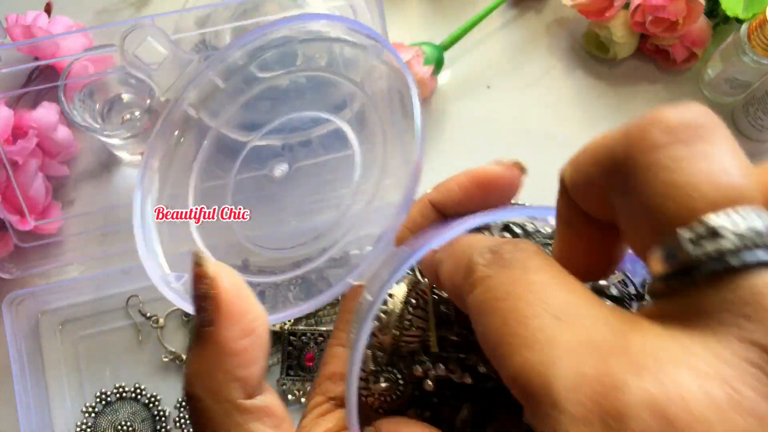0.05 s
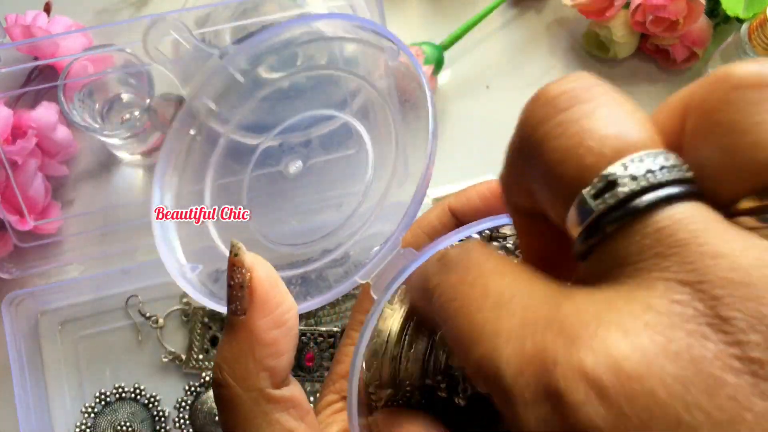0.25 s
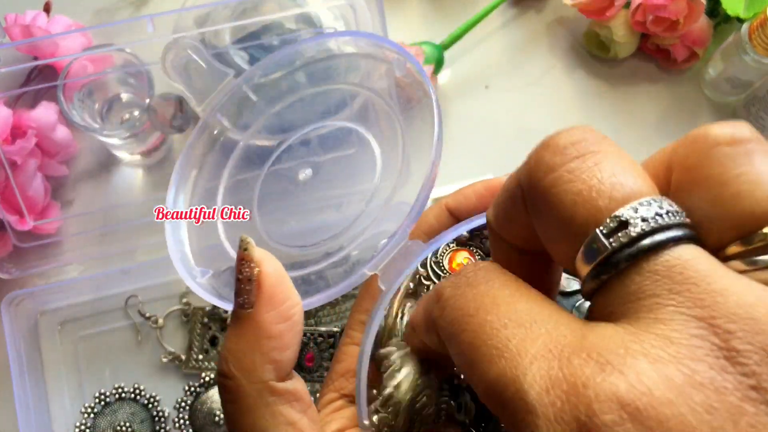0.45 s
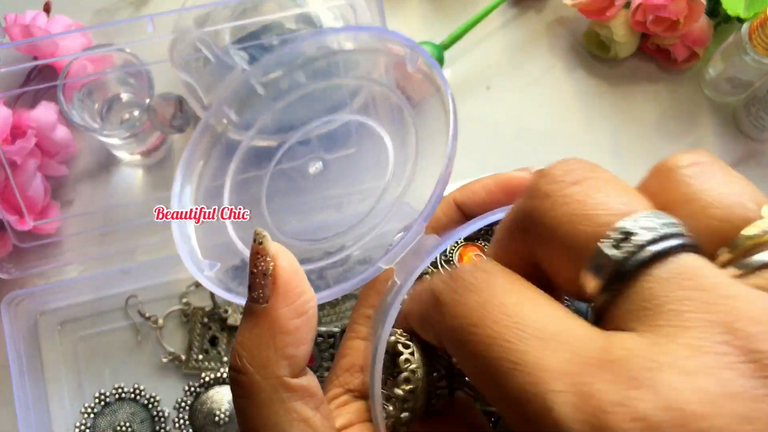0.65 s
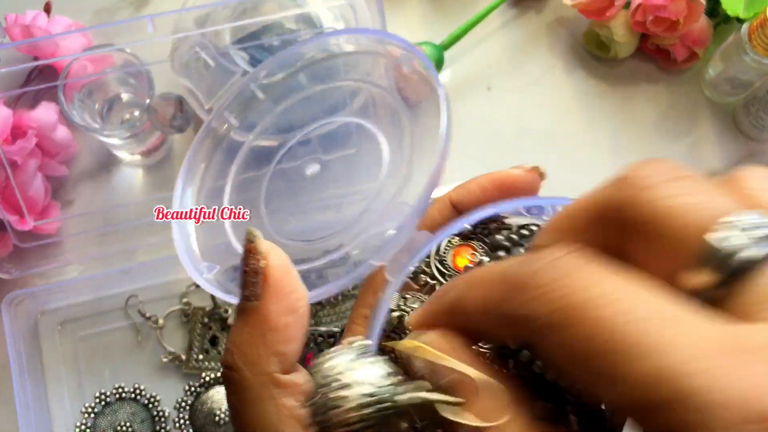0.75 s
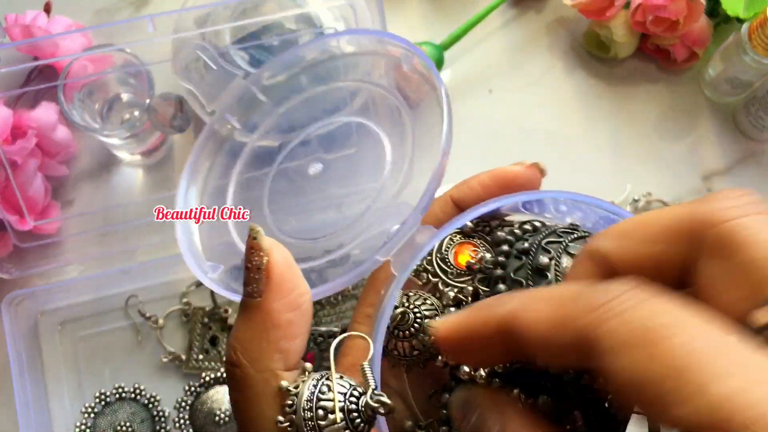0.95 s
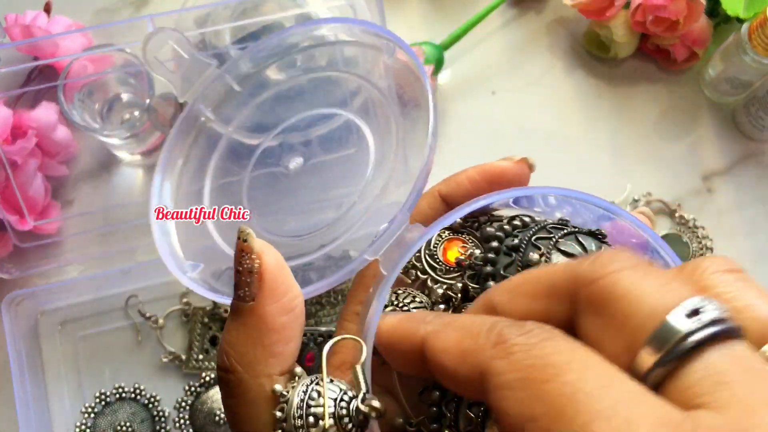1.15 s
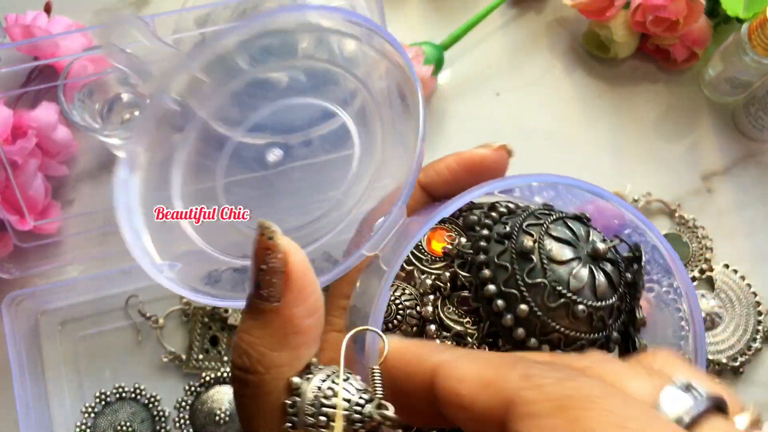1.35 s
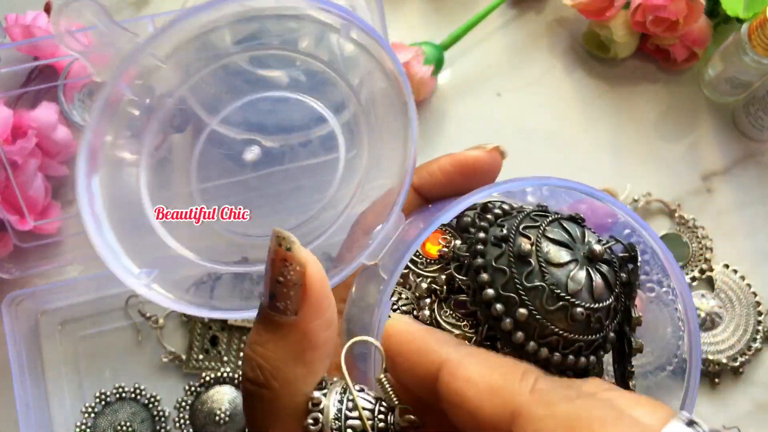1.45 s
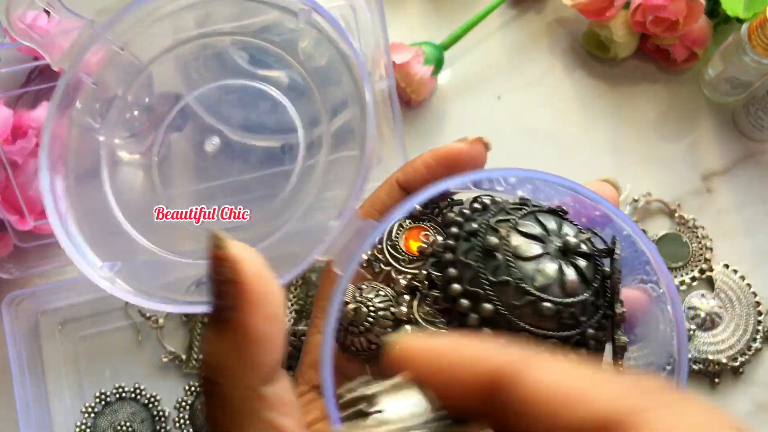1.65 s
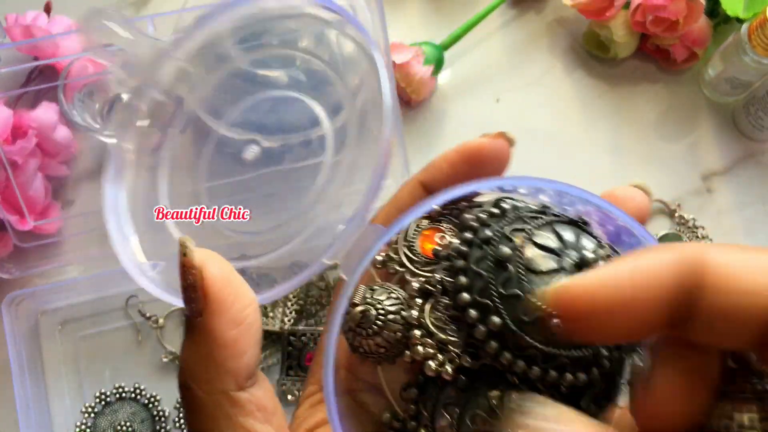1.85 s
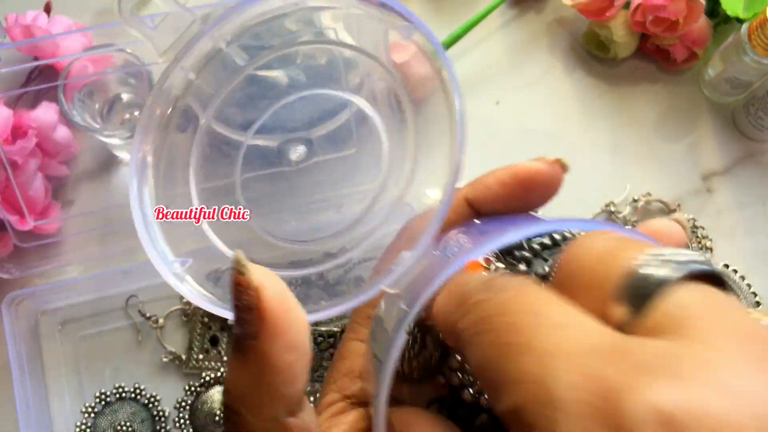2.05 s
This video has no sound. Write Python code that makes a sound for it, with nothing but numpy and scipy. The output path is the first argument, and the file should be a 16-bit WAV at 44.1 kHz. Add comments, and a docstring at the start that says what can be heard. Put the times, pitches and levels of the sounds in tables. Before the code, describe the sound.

Small metal earrings rattle and clink close by as fingers dig through a plastic tub, in quick surges from about 0.2 to 0.7 seconds. At 0.8 seconds the tub takes one hollow knock. Softer nail taps and finger rubs on the plastic follow. Tiny beads jingle very high around 1.8 seconds, and the earrings shift lightly just after 2 seconds. The quiet room has a faint hum.

```python
"""Fingers dig through small metal earrings in a plastic tub, close by in a quiet room with a faint mains hum.
Skin rubs softly, single pieces clink, and the heap shifts in rattling surges of tiny collisions that set
the metal ringing, while pieces bump the wall. Dangling beads jingle very high and the tub takes one hollow
knock. Then nails and hooks tap the plastic, fingers rub along it, and the beads shake again near the end."""
import sys
import numpy as np
from scipy import signal
from scipy.fft import rfft, irfft
from scipy.io import wavfile

SR = 44100
rng = np.random.default_rng(int(sys.argv[2]) if len(sys.argv) > 2 else 0)


def materialize(psi):
    """Save the field psi as 16-bit PCM at rate SR to the path in sys.argv[1].

    A 1-D psi becomes a single channel; in a 2-D psi each row is a channel.
    """
    bounded = np.clip(np.atleast_2d(psi).T, -1, 1)
    quanta = np.round(bounded * 32767).astype(np.int16)
    wavfile.write(sys.argv[1], SR, quanta)


N = 92610


def amp(db):
    """Decibels to gain."""
    return 10 ** (np.asarray(db) / 20)


def unit_rms(x):
    """Scales to rms 1."""
    return x / np.sqrt(np.mean(x ** 2) + 1e-20)


def curve_at(points, hz):
    """Reads a curve on a log-frequency axis."""
    freqs, values = np.transpose(points)
    return np.interp(np.log(hz + 1), np.log(freqs + 1), values)


def add(mix, start_s, sound):
    """Mixes a sound in at its start time."""
    part = mix[max(round(start_s * SR), 0):][:len(sound)]
    part += sound[:len(part)]


def equalise(x, points, size=1024):
    """Minimum-phase EQ through points of (frequency [Hz], gain [dB])."""
    log_gain = np.log(amp(curve_at(points, abs(np.fft.fftfreq(size, 1 / SR)))))
    impulse = np.fft.ifft(np.exp(np.conj(signal.hilbert(log_gain)))).real
    return signal.fftconvolve(x, impulse[:size // 2])


def low_cut(x, hz):
    """Steep high-pass."""
    return signal.sosfilt(signal.butter(4, hz, "highpass", fs=SR, output="sos"), x)


def flat_noise(size):
    """Noise with an even spectrum and random phases."""
    return unit_rms(irfft(np.exp(2j * np.pi * rng.random(size // 2 + 1))))


def ring(modes, detune=1):
    """Dying sines of a struck object."""
    t = np.arange(SR // 3) / SR
    return sum(amp(db - 60 * t / t60) * np.sin(2 * np.pi * hz * detune * t) for hz, db, t60 in modes)


def contact_tone(x, lows, mids, top, resonance_hz=None):
    """Voices one contact: lows, mids and top in dB against 6 kHz, and a brief resonance if struck."""
    # EQ points for lows, mids, reference and top: (frequency [Hz])
    bands_hz = [900, 2500, 6000, 13000]
    if resonance_hz is not None:
        b, a = signal.iirpeak(resonance_hz, Q=4, fs=SR)
        x = (x + amp(1) * signal.lfilter(b, a, x)) / np.sqrt(2)
    return equalise(x, list(zip(bands_hz, [lows, mids, 0, top])), size=256)


def swarms(rows, grains_per_s, spread_db, grain_decay_s=0.00066, fuzz=0.44, size=16384):
    """Crowds of tiny collisions that swell to a crest and die away."""
    out = np.zeros(N + size)
    t = (np.arange(size) - size // 2) / SR  # zero at the crest
    power_decay = np.exp(-2 / (grain_decay_s * SR))
    for crest_s, db, rise, fall, *tone in rows:
        onsets = rng.random(size) < grains_per_s / SR
        hits = onsets * amp(spread_db * np.minimum(rng.exponential(1, size), 4))
        clicks = hits * rng.choice([-1, 1], size)
        tails = np.sqrt(signal.lfilter([1], [1, -power_decay], hits ** 2))  # each click trails noise
        grains = unit_rms(clicks + fuzz * tails * rng.standard_normal(size))
        swell = np.exp(np.minimum(t / rise, -t / fall))
        add(out, crest_s, amp(db) * contact_tone(grains * swell, *tone))
    return out[size // 2:][:N]


def strikes(rows):
    """Each strike is a snap followed by a few milliseconds of chatter."""
    out = np.zeros(N)
    for start_s, db, decay, *tone in rows:
        chatter = np.concatenate([flat_noise(64) for _ in range(24)])
        chatter[0] = 3.2  # the snap
        t = np.arange(len(chatter)) / SR
        add(out, start_s, amp(db) * contact_tone(chatter * np.exp(-t / decay), *tone))
    return out


def room_tone(air_db=-57.5):
    """A bed of low room air and steady mains hum."""
    # Spectrum of the air: (frequency [Hz], relative level [dB])
    air_curve = [(20, -33.5), (35, -11), (56, 7.5), (72, 0.5), (130, -4.5), (250, -4), (400, -14.5),
                 (1000, -21), (4000, -28), (9000, -35.5), (15500, -29)]
    # Hum tones: (frequency [Hz], rms level [dB])
    hum_tones = [(55.5, -67.5), (100, -63.5), (200, -67.5)]
    t = np.arange(N) / SR
    air_gain = amp(curve_at(air_curve, np.fft.rfftfreq(N, 1 / SR)))
    air = irfft(rfft(rng.standard_normal(N)) * air_gain, N)
    hum = sum(amp(db) * np.sqrt(2) * np.sin(2 * np.pi * (hz * t + rng.random())) for hz, db in hum_tones)
    return amp(air_db) * unit_rms(air) + hum


def finger_rubs():
    """Skin drags over plastic and filigree in soft, grainy swells."""
    # Strokes: (crest time [s], level [dB], rise [s], fall [s], lows [dB], mids [dB], top [dB])
    strokes = [(.025, -51.5, 0.15, 0.015, 2.5, 3.5, -0.5), (.088, -44, 0.018, 0.027, 5, 4, -0.5),
               (.112, -47.5, 0.0044, 0.049, -3, 2, -12), (.83, -51.5, 0.035, 0.094, 6, 4, 6.5),
               (1.012, -51, 0.015, 0.023, 7, 6, -8), (1.128, -41.5, 0.0054, 0.026, -13, -6.5, -18),
               (1.29, -51, 0.11, 0.074, 1.5, 1.5, -3), (1.385, -52, 0.073, 0.097, -21, -11, -5),
               (1.458, -41.5, 0.034, 0.023, -0.5, -1.5, -13), (1.535, -42, 0.016, 0.013, 3, 5, -9),
               (1.618, -44, 0.011, 0.011, -0.5, -2, -2), (1.72, -65.5, 0.047, 0.027, -12, 3, 11),
               (1.92, -60.5, .02, 0.01, -28, -7, 11), (1.805, -43, 0.025, 0.029, -5, -4, -3),
               (1.872, -44, 0.024, 0.0077, -4.5, -3, 6.5), (2.025, -45.5, 0.0033, 0.034, 4.5, 2.5, -1),
               (2.072, -48.5, 0.0095, 0.025, 2, 5, -1)]
    return swarms(strokes, grains_per_s=7000, spread_db=4)


def earring_clinks():
    """Metal strikes metal, one piece at a time."""
    # Clinks: (time [s], level [dB], decay [s], lows [dB], mids [dB], top [dB], resonance [Hz])
    clinks = [(.0615, -36, 0.0019, -5, -18, 4, 7200), (.101, -26.5, 0.0036, 7.5, 5, 2, 6100),
              (.1205, -29, 0.0023, 0.5, 4.5, -7, 3740), (.1962, -41, 0.009, 8.5, 6.5, -1, 6000),
              (.2675, -18, 0.0011, -20, -9.5, 8, 3170), (.2843, -6.5, 0.0011, -29, -16, 2, 6430),
              (.2945, -7.5, 0.0018, -29, -0.5, -4, 6250), (.3262, -14, .0015, -16, -5, 4, 6200),
              (.3392, -11.5, 0.0011, 5.5, -17, -17, 6000), (.356, -12.5, 0.002, -14, -25, -3, 6200),
              (.4255, -26.5, 0.0071, 1, -2, 1, 1130), (.457, -14, 0.00061, 6, 6.5, -2, 4250),
              (.4797, -11.5, 0.00075, -12, 0, -4, 3100), (.4838, -16.5, 0.002, -33, 6, -2, 4260),
              (.497, -21, 0.0031, 6.5, -4, -5, 1050), (.5112, -18.5, .001, -2, 1, 9, 5780),
              (.518, -10, 0.0014, -11.5, -5, -0.5, 3160), (.557, -20, 0.0007, -7, 0.5, -3.5, 3420),
              (.6195, -24.5, 0.00088, -16, 6, -9, 4110), (.6355, -21, 0.0013, -16, 0, 2, 6000),
              (.6455, -2, 0.00084, -10, -13, -5, 3970), (.669, -26.5, 0.0038, 1.5, -1, -15, 3550),
              (.7088, -14.5, 0.0013, 1.5, -5, -5, 4000), (.737, -34, .0012, -15, 3, 4, 13800),
              (.778, -31.5, .003, -5, -4, 6, 3790), (.829, -33, 0.0016, 7, -15, 11, 8520)]
    return strikes(clinks)


def earring_ring(blows, piece_s=.02, tuning_spread=.07):
    """One earring after another takes the blows and rings, each tuned a little differently."""
    # Modes of an earring: (frequency [Hz], gain [dB], t60 [s])
    metal_modes = [(1060, -58.5, 0.099), (1162, -39, 0.035), (2280, -40.5, 0.088), (4415, -36, 0.027),
                   (6400, -61, 0.069), (6960, -55, 0.054)]
    piece = np.arange(N) // round(piece_s * SR)
    out = np.zeros(N)
    for k in np.unique(piece):
        detune = 1 + tuning_spread * rng.uniform(-0.95, 1)
        add(out, k * piece_s, signal.fftconvolve(blows[piece == k], ring(metal_modes, detune)))
    return out


def heap_surges():
    """The heap shifts and many pieces collide in a rattling rush."""
    # Surges: (crest time [s], level [dB], rise [s], fall [s],
    #          lows [dB], mids [dB], top [dB], resonance [Hz])
    surges = [(.2355, -15.5, 0.0057, 0.0078, -0.5, 3.5, 3, 3030),
              (.279, -21, 0.0026, 0.013, -8, 3, -0.5, 3160),
              (.294, -13, 0.0082, 0.0085, 0.5, -0.5, 4, 1015),
              (.330, -19.5, 0.0082, 0.0073, -12, 2, -2, 11600),
              (.340, -22, 0.0012, 0.011, 0.5, 3.5, 9.5, 6300), (.359, -20, 0.003, 0.012, -4, 1.5, 4, 6160),
              (.371, -20, 0.0029, 0.0018, 0, -10, -4, 6370),
              (.392, -35.5, 0.0053, 0.042, -4, 10.5, 5, 1070),
              (.437, -24.5, 0.0011, 0.014, 2, 6.5, 4.5, 3030),
              (.4578, -16, 0.0008, 0.0017, 1, 3.5, 2, 4120), (.470, -20.5, 0.0032, 0.0062, 4.5, 1, 5, 1040),
              (.484, -22, 0.0018, 0.01, -2, -5, 4, 12300), (.504, -18.5, 0.0018, 0.0051, -6, 1.5, 4, 5450),
              (.524, -25.5, 0.0026, 0.022, -8.5, 2.5, -2, 1050),
              (.620, -37, 0.018, 0.022, 7, 5.5, 0.5, 4020),
              (.647, -9.5, 0.0035, 0.0041, -13, -14.5, -2, 3770),
              (.658, -31.5, 0.0057, 0.026, 6, 8.5, 3, 6900), (.716, -41, 0.0067, 0.026, 2.5, 6.5, -4, 1030),
              (1.781, -37, 0.0057, 0.0046, 8.5, 8, 2, 4040),
              (2.088, -32.5, 0.0055, 0.042, 8.5, 8.5, 4, 5170)]
    return swarms(surges, grains_per_s=6000, spread_db=4.5)


def wall_bumps():
    """A piece bumps the tub wall, whose short, thin note depends on the spot."""
    # Wall notes: (time [s], frequency [Hz], level [dB], t60 [s])
    bumps = [(0.231, 1067, -19, 0.056), (0.235, 2280, -18.5, 0.029), (.2895, 883, -16, 0.021),
             (.933, 970, -30, 0.013), (1.4255, 814, -22, 0.015), (1.541, 350, -35, 0.011)]
    out = np.zeros(N)
    for start_s, hz, db, t60 in bumps:
        add(out, start_s, low_cut(ring([(hz, db, t60)]), hz / np.sqrt(2)))
    return out


def bead_jingles(beads=3, rebound_s=.006, tuning_spread=.008):
    """Tiny dangling beads ring at each shake, a little apart and never quite alike."""
    # Shakes: (time [s], level [dB])
    shakes = [(.753, -40), (.832, -40), (.839, -41), (0.857, -34), (1.758, -36), (1.793, -24), (1.801, -23),
              (1.806, -20.5), (1.812, -41), (1.8224, -26), (1.83, -30), (1.848, -50)]
    # Modes of a bead: (frequency [Hz], level [dB], t60 [s])
    bead_modes = [(11600, -10, .006), (12280, -8, 0.03), (12430, -6, 0.04), (12650, -8, 0.03),
                  (13100, -6.5, 0.015), (14400, -7, .006)]
    out = np.zeros(N)
    for shake_s, db in shakes:
        for mode in bead_modes * beads:
            start_s = shake_s + rebound_s * rng.random()
            detune = 1 + tuning_spread * rng.standard_normal()
            add(out, start_s, amp(db) / np.sqrt(beads) * ring([mode], detune))
    return out


def nail_taps():
    """Nails and hooks tick against the plastic."""
    # Taps: (time [s], level [dB], decay [s], lows [dB], mids [dB], top [dB], resonance [Hz])
    taps = [(.7872, -12.5, 0.0047, -9, -21, -27, 3600), (.7903, -19, 0.0025, -39, 4, 7, 3440),
            (.9317, -24, 0.0027, 6.5, 9, -6, 5600), (.940, -16, 0.0017, -3, -7.5, -11.5, 5500),
            (.9605, -32.5, 0.0015, 1, 8.5, -15, 5500), (1.0757, -35.5, 0.0038, 5, -4, -19, 3600),
            (1.1863, -36.5, 0.0014, -11, 7.5, -3, 4100), (1.260, -36, 0.007, 8.5, 1, -10, 2330),
            (1.2668, -25.5, 0.0028, -2.5, 9, -5.5, 2170), (1.330, -20, 0.0027, -6, -4, -10, 3620),
            (1.338, -37, 0.0041, 2, 5, -14, 3600), (1.4245, -27.5, 0.0051, -10, 4, 2.5, 4400),
            (1.4288, -23.5, 0.0026, 3.5, 6.5, -13, 1020), (1.5295, -36.5, 0.0054, -6, 4.5, -7, 2110),
            (1.5395, -36.5, 0.0039, 6.5, 8, -2, 5600), (1.5735, -41.5, 0.0011, -5.5, 6, 0, 12400),
            (1.5975, -46.5, 0.0031, 12, 3.5, -1.5, 4200), (1.7578, -38.5, 0.0014, -15, -15, 8, 12150),
            (1.949, -43, 0.00055, -21, -6, 12, 13250), (1.959, -43.5, 0.00063, -14, -6, 8.5, 12300),
            (1.9716, -46.5, 0.0011, -30, -3, 11, 13100), (2.008, -35.5, 0.0048, 8.5, 5, 1.5, 6200),
            (2.0228, -39.5, 0.0017, 12, 9, -1, 2760)]
    return strikes(taps)


def tub_knock(start_s=.7905, gain_db=-17):
    """One hollow knock on the whole tub, which is too small to radiate bass."""
    # Modes of the plastic tub: (frequency [Hz], level [dB], t60 [s])
    tub_modes = [(378, -24, 0.0066), (550, -21, 0.098), (830, -7, 0.018), (930, 5, 0.011),
                 (1410, -4, 0.024), (1970, -17.5, 0.031), (2330, -9, 0.015), (3600, 0, 0.016)]
    out = np.zeros(N)
    add(out, start_s, amp(gain_db) * low_cut(ring(tub_modes), hz=324))
    return out


def echo_pattern(early_db=-6, early_decay_s=0.0043, tail_db=-13.5, size=16384):
    """Quick reflections from tub and table, then a short room tail."""
    # Room decay: (frequency [Hz], t60 [s])
    decay_times = [(300, 0.33), (1000, 0.33), (4000, 0.27), (13000, 0.22)]
    t = np.arange(size) / SR
    early = flat_noise(size) * np.exp(-t / early_decay_s) * (t > .001)
    hz, frame_s, spectra = signal.stft(flat_noise(size) * (t > .005), SR, nperseg=256)
    fade = amp(-60 * frame_s / curve_at(decay_times, hz)[:, None])
    tail = signal.istft(spectra * fade, SR, nperseg=256)[1][:size]
    return amp(early_db) * early / np.linalg.norm(early) + amp(tail_db) * tail / np.linalg.norm(tail)


def room_reverb(x, patterns=4, crossfade_hz=3):
    """Echo patterns crossfade, so the reflections keep changing as hands and pieces move."""
    phase = 2 * np.pi * crossfade_hz * np.arange(N) / SR
    sends = (np.maximum(np.cos(phase + 2 * np.pi * k / patterns), 0) for k in range(patterns))
    return sum(signal.fftconvolve(x * send, echo_pattern())[:N] for send in sends)


def scene():
    """The handling in its room, in mono; only surges and clinks set the earrings ringing."""
    # Overall colour of the contacts: (frequency [Hz], gain [dB])
    contact_eq = [(60, -28.5), (250, -8), (520, -4), (800, 2.5), (1080, 5.5), (1330, 2.5), (1900, 0),
                  (3600, 4), (5000, 2.5), (6200, 5), (7900, -1), (8700, 1.5), (10200, -5.5), (12000, -1),
                  (15800, -7)]
    metal = heap_surges() + earring_clinks()
    plastic = finger_rubs() + nail_taps()
    contacts = equalise(metal + plastic + earring_ring(metal), contact_eq)[:N]
    close = contacts + wall_bumps() + bead_jingles() + tub_knock()
    return (close + room_reverb(close) + room_tone())[None]


def record(dry, ceiling=.85, cutoff_hz=16000):
    """A soft clip rounds off the sharpest peaks, with a low-pass before and after it."""
    low_pass = signal.firwin(511, cutoff_hz, window=("kaiser", 9), fs=SR)[None]
    filtered = signal.oaconvolve(dry, low_pass, "same")
    rounded = filtered / (1 + (filtered / ceiling) ** 4) ** .25
    return signal.oaconvolve(rounded, low_pass, "same")


dry = scene()
out = record(dry)
materialize(out)
```